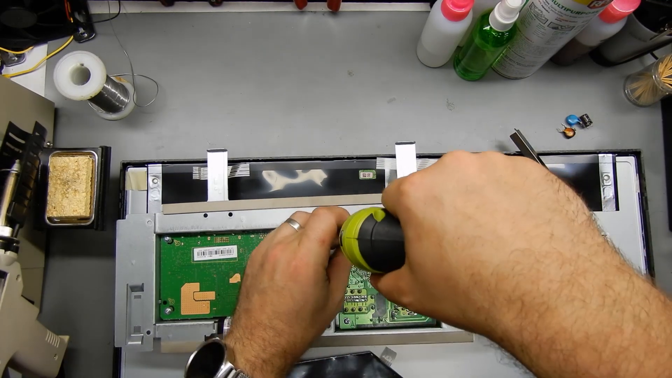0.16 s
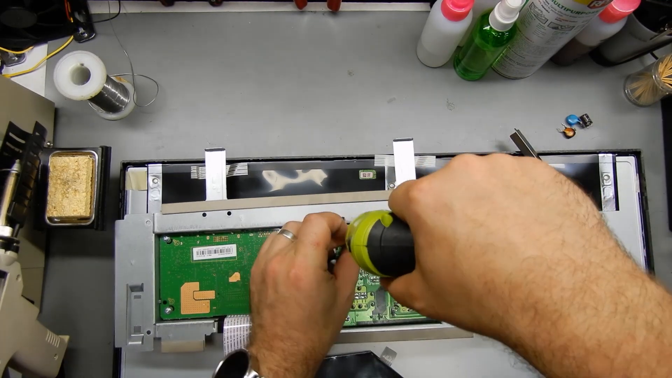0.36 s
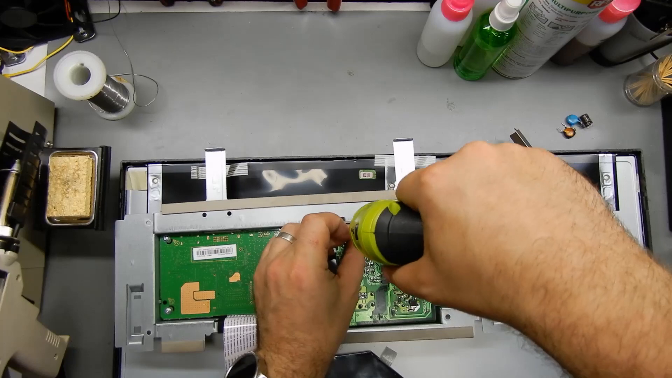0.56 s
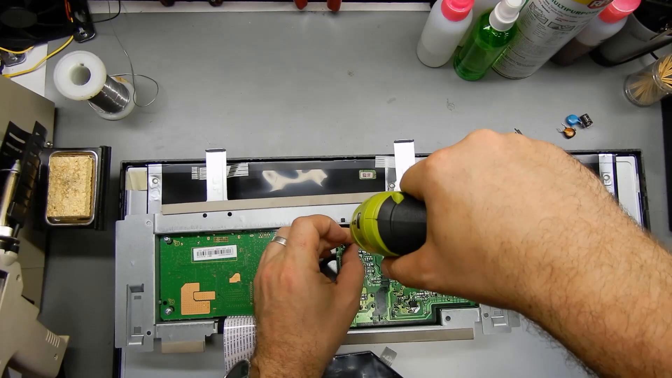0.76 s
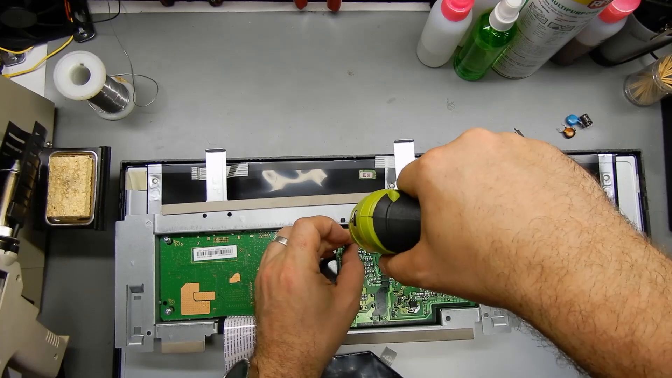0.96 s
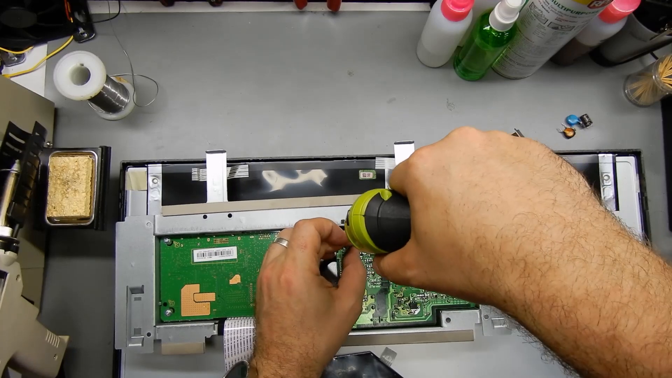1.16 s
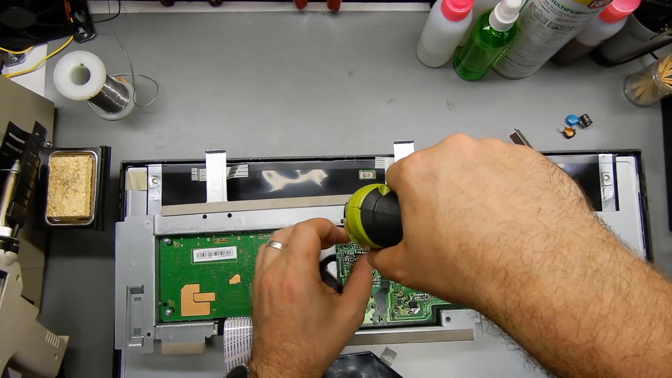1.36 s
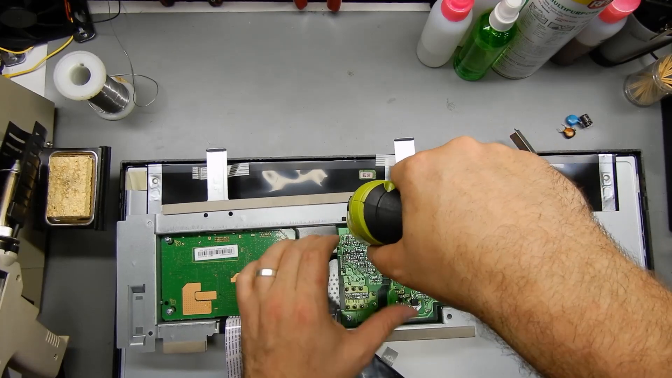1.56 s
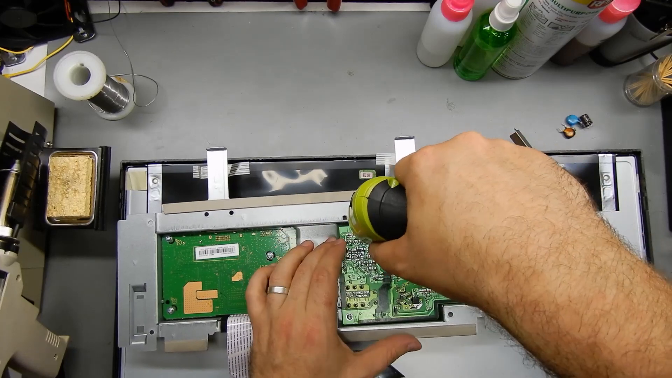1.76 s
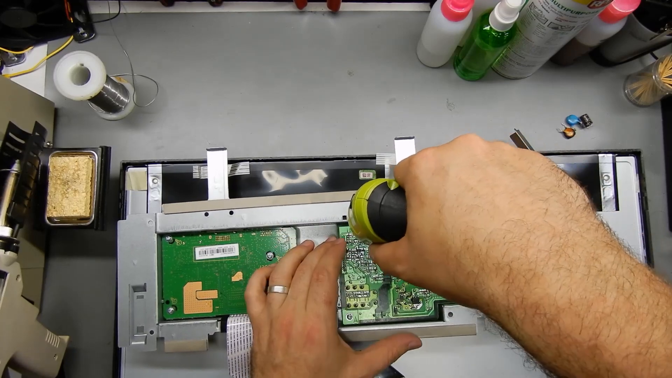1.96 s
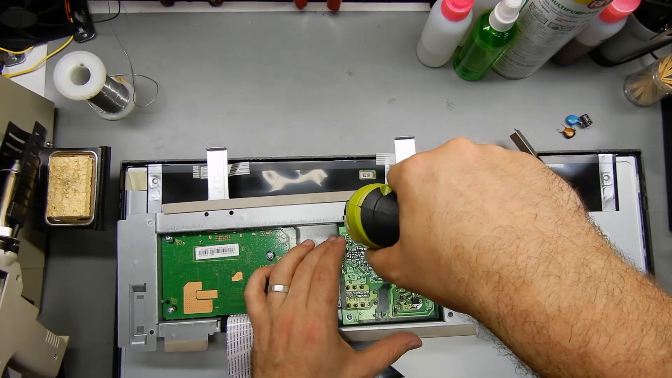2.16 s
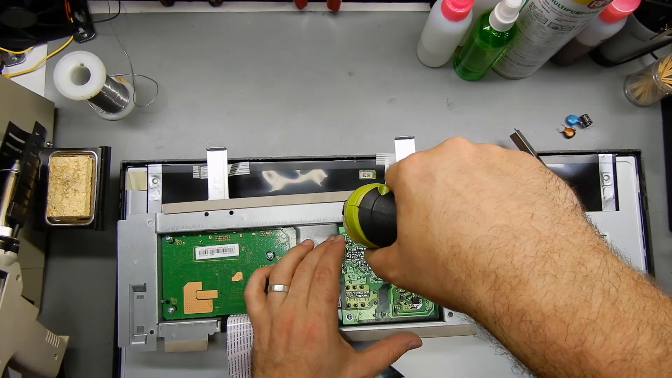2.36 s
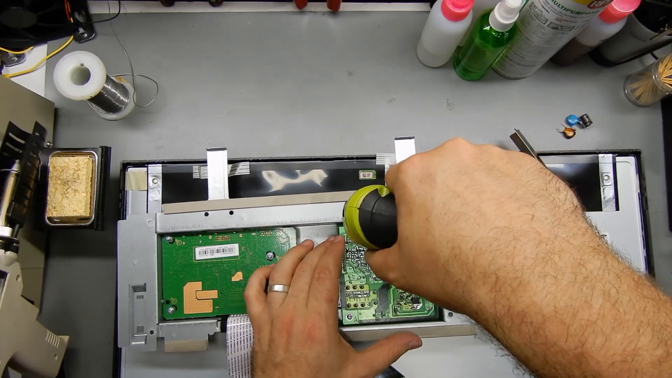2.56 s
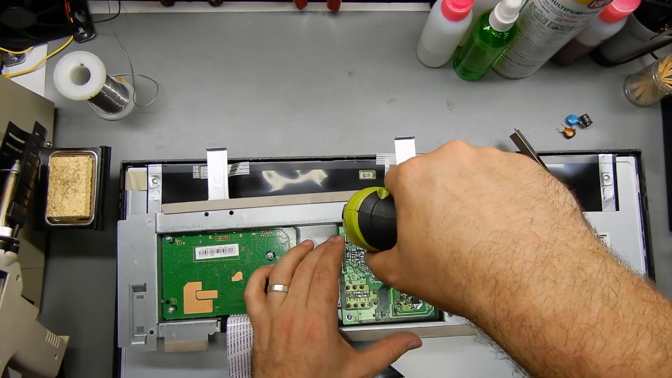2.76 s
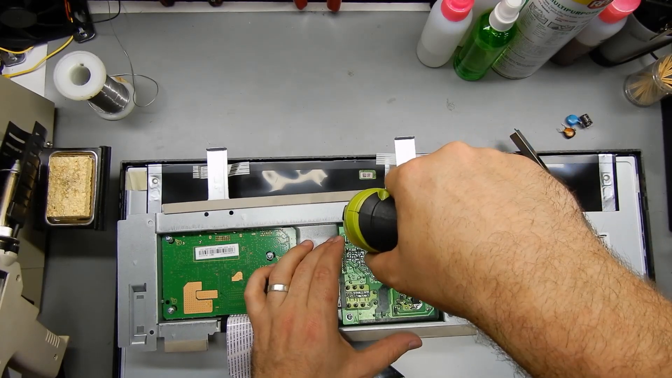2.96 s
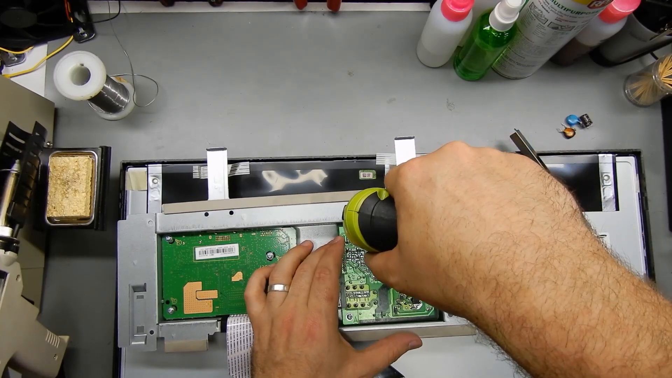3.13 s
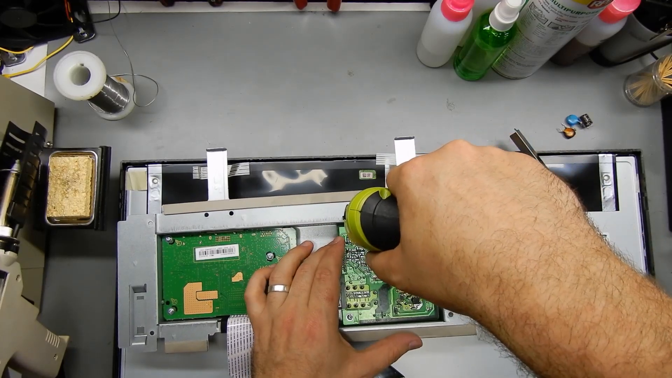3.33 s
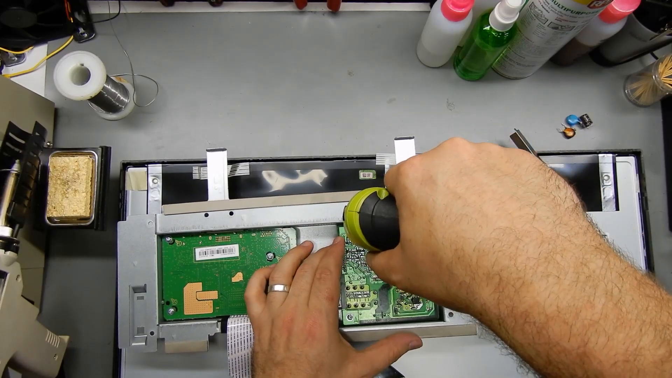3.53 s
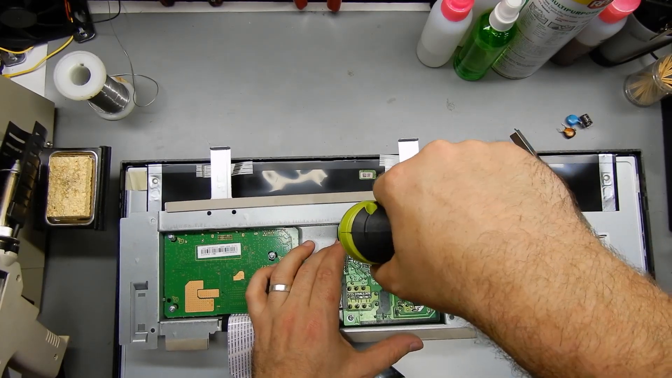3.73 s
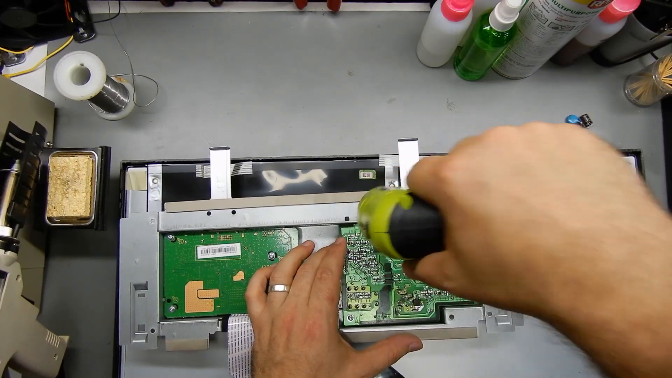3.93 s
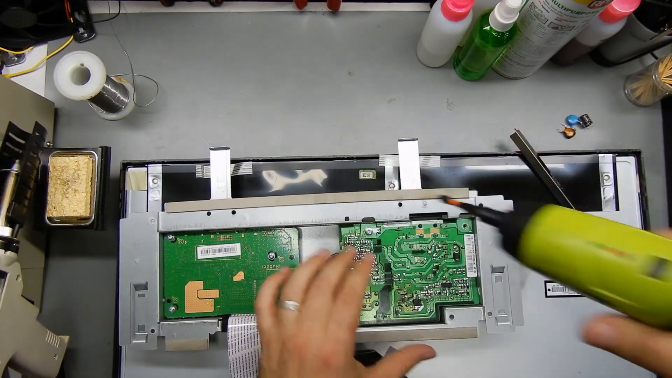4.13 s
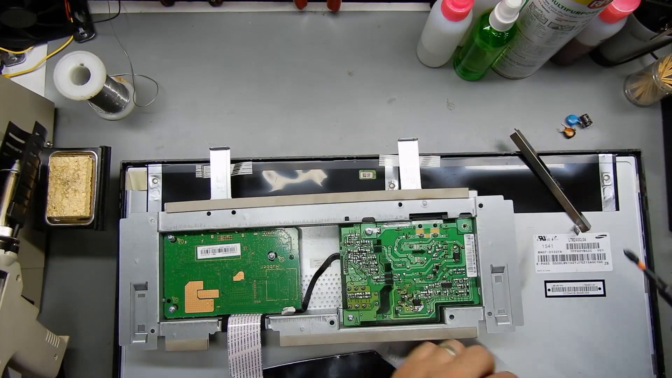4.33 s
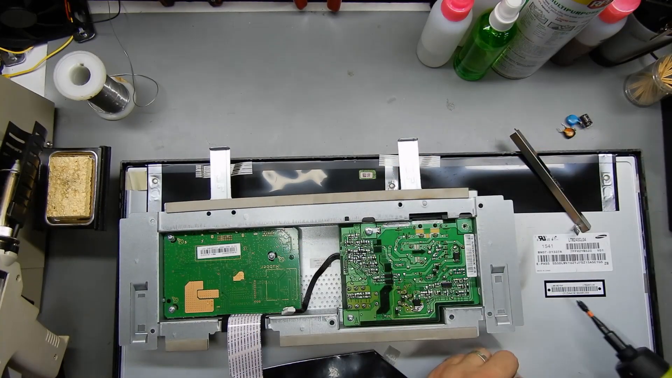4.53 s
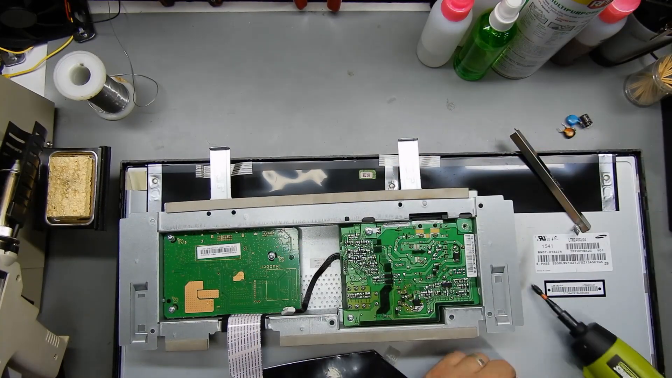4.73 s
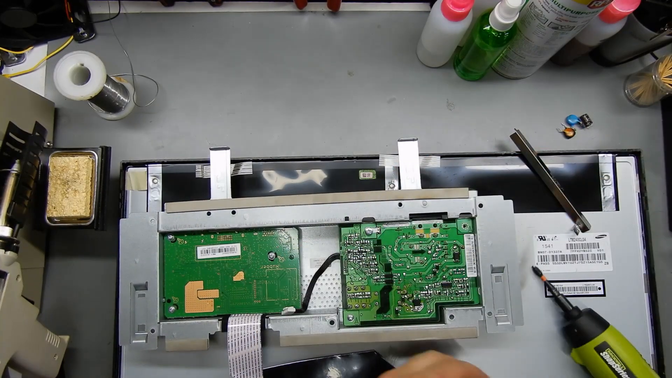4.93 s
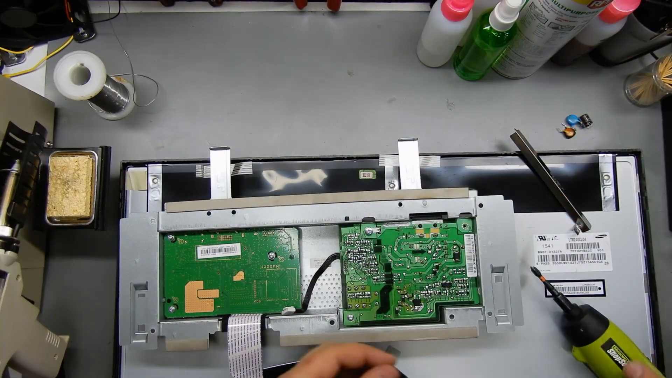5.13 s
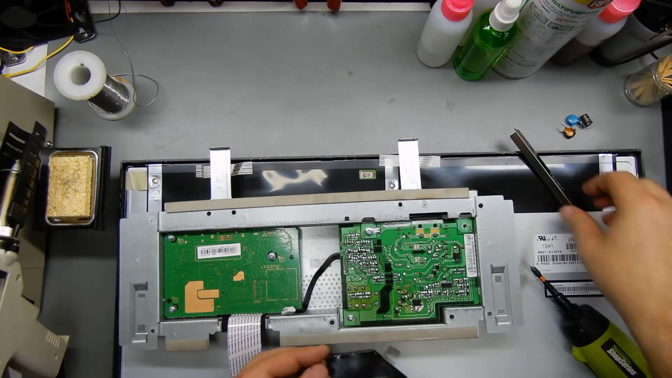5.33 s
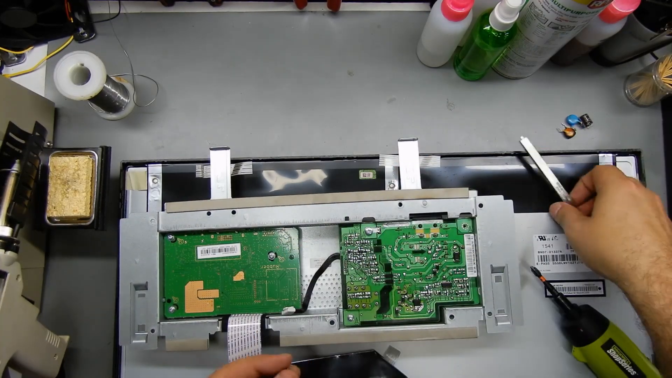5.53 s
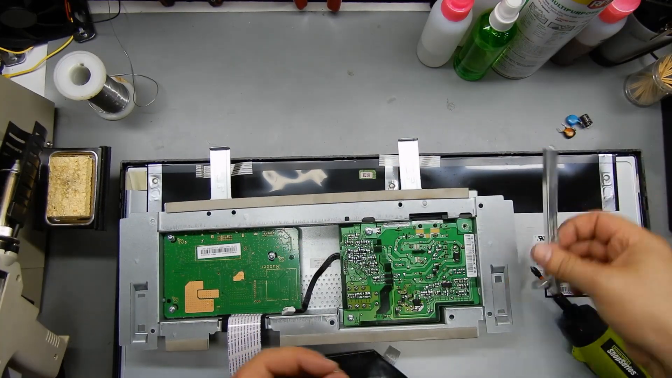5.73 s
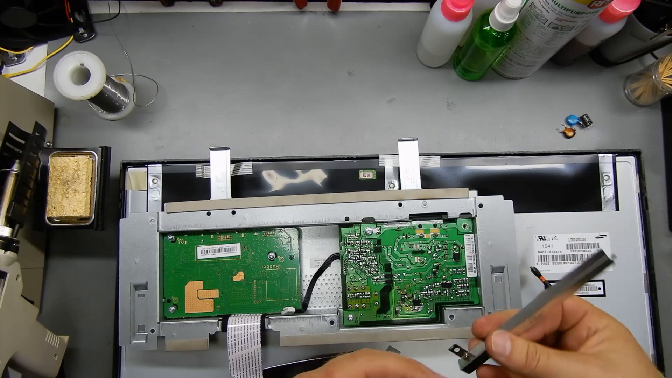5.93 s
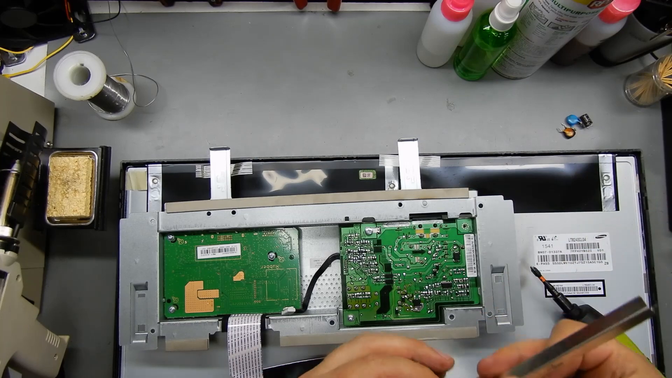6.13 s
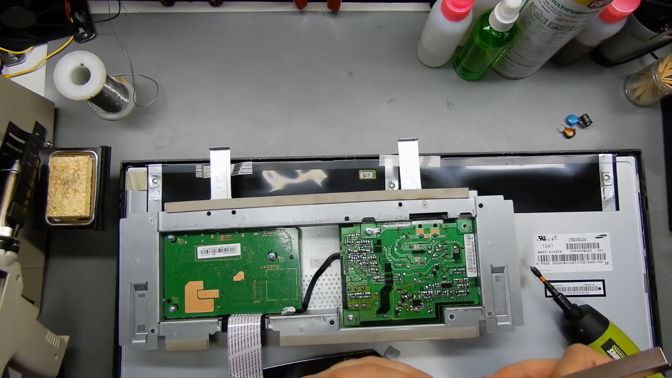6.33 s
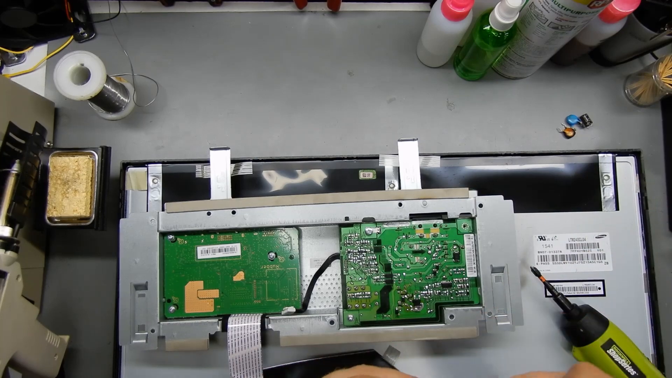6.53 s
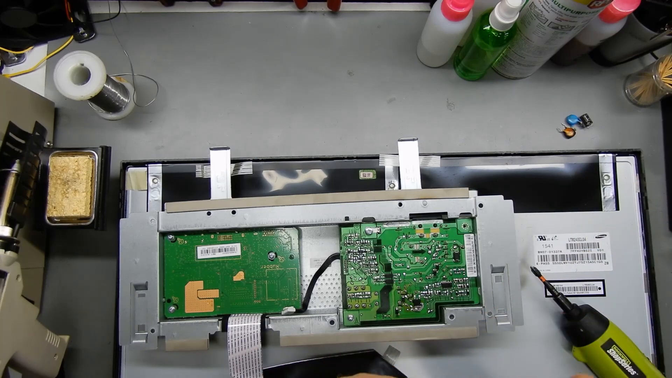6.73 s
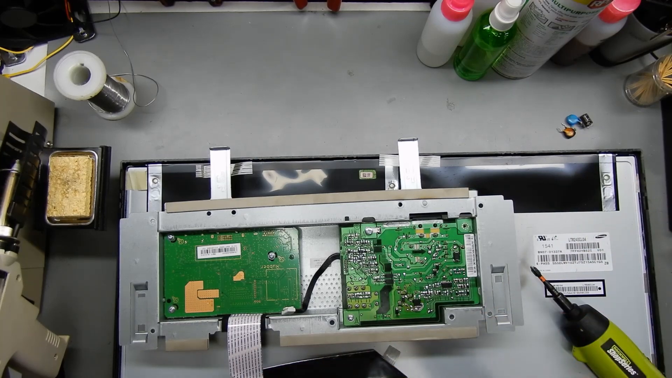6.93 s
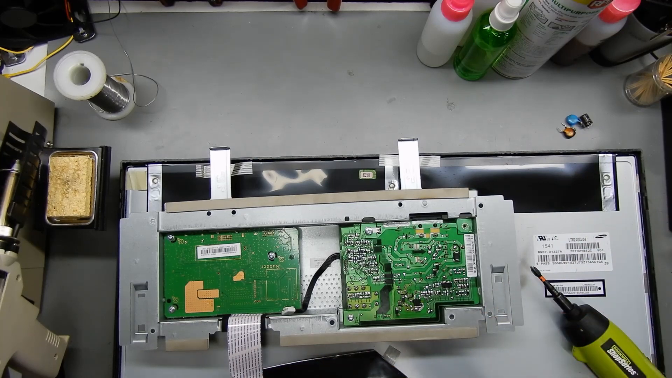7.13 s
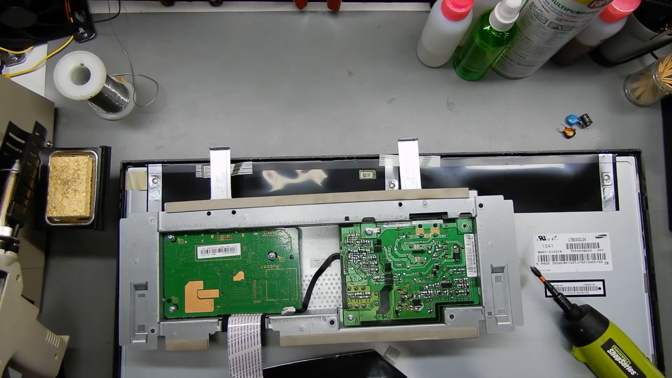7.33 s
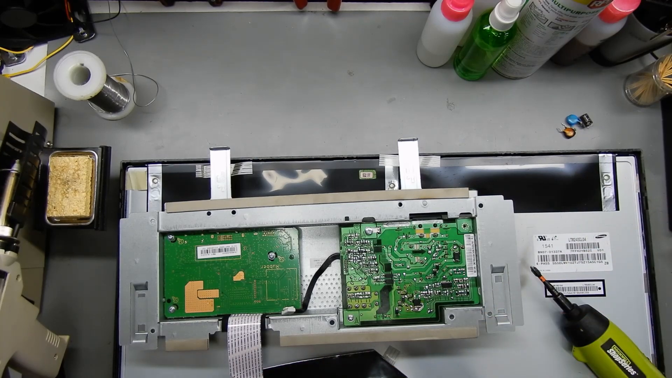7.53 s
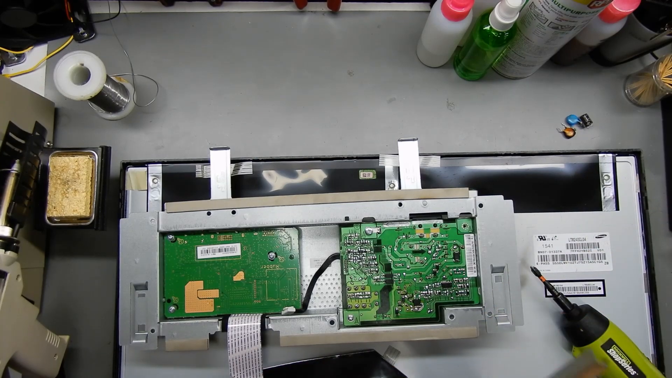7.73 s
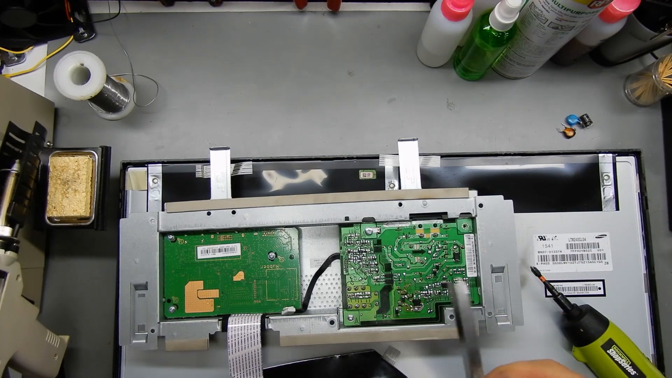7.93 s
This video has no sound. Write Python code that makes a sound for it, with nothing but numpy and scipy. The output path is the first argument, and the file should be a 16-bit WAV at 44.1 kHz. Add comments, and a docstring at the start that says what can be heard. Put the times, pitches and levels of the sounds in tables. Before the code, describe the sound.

A screw bit taps into place, a small electric driver buzzes and tightens a screw, then is laid on sheet metal with a clank.

```python
"""In a quiet workshop, a cordless screwdriver drives a screw through a circuit board into sheet metal, close by.
The bit clicks into the screw head; the motor spins up, sags as the thread binds, and grinds as the screw seats.
The tool is laid on the chassis and rocks to rest, a metal strip is picked up, the bench is bumped, parts tick.
Shaft-locked tones and gear-gated noise make the tool; filtered noise bursts and damped modes make the contacts."""
import sys
import numpy as np
from scipy import signal
from scipy.fft import rfft, irfft, next_fast_len
from scipy.io import wavfile
from scipy.ndimage import map_coordinates

SR = 44100
rng = np.random.default_rng(int(sys.argv[2]) if len(sys.argv) > 2 else 0)


def store_wav(level_fs):
    """Save 16-bit WAV to argv[1]."""
    pcm = np.round(np.clip(np.atleast_2d(level_fs), -1, 1) * 32767)
    wavfile.write(sys.argv[1], SR, pcm.T.astype(np.int16))


N = 351902

TRIGGER_S = 1.432  # the trigger is pressed
FREE_HZ = 417.1  # turns per second of the unloaded motor


def amp(db):
    """Level to gain: 20 dB is a factor of ten in amplitude."""
    return 10 ** (np.asarray(db) / 20)


def unit(x):
    """Normalisation: x at rms 1."""
    return x / np.sqrt(np.mean(x ** 2) + 1e-20)


def along(points, hz):
    """Linear interpolation of (frequency, value) points on a logarithmic frequency axis."""
    f, v = np.transpose(points)
    return np.interp(np.log(hz + 1), np.log(f + 1), v)


def wobble(rate):
    """Slow modulation: a smooth random curve through `rate` normal knots a second."""
    knots = rng.standard_normal(int(N * rate / SR) + 4)
    return map_coordinates(knots, [np.arange(N) * rate / SR])


def swells(rows):
    """Superposition of Gaussian rises, each (middle_s, half_width_s, height)."""
    t = np.arange(N) / SR
    return sum(height * np.exp(-((t - middle) / half) ** 2) for middle, half, height in rows)


def coloured(x, spectrum):
    """Minimum-phase filtering: unit power gain, falling away outside the (hz, level_db) points."""
    m = next_fast_len(len(x) + 4096)
    hz = np.fft.rfftfreq(m, 1 / SR)
    skirted = [(spectrum[0][0] / 2, -90), *spectrum, (spectrum[-1][0] * 2, -90)]
    gain = amp(along(skirted, hz))
    # folding the cepstrum onto positive times makes the filter causal
    cepstrum = irfft(np.log(unit(gain) + 1e-6), m)
    cepstrum[1:m // 2] *= 2
    cepstrum[m // 2 + 1:] = 0
    response = np.exp(rfft(cepstrum))
    return irfft(rfft(x, m) * response, m)[:len(x)]


def rush(spectrum, grit_db=0):
    """Broadband noise of rms 1; grit breaks it into tiny contacts before it is coloured."""
    grains = rng.standard_normal(N) * amp(grit_db * wobble(1500))
    return unit(coloured(grains, spectrum))


def fade(t, t60):
    """Exponential damping: 60 dB down after t60 seconds."""
    return np.exp(-np.log(1000) * t / max(t60, 1e-4))


def ring(modes, t, detune=0):
    """Modal synthesis: damped sines whose strength and pitch change with the point of contact."""
    out = 0
    for hz, db, t60 in modes:
        strength = amp(db + rng.normal(0, 3))
        pitch = hz * (1 + detune * rng.standard_normal())
        out = out + strength * fade(t, t60) * np.sin(2 * np.pi * pitch * t)
    return out


def burst(t, crack, buzz_db, t60, rise):
    """Contact force: a brief noisy crack, then the dying buzz of loose parts (crack and rise are t60s)."""
    envelope = fade(t, crack) + amp(buzz_db) * fade(t, t60)
    return (1 - fade(t, rise)) * envelope * rng.standard_normal(len(t))


def add(track, s, sound):
    """Superposition: mix a sound into a track at s seconds."""
    part = track[max(round(s * SR), 0):][:len(sound)]
    part += sound[:len(part)]


def background():
    """Background noise: low rumble of building and bench, swelling as things are handled, under steady hiss."""
    # noise colours: hz, density_db (relative)
    rumble = [(20, -24), (35, -8), (60, -1), (107, -10), (140, -15.5), (175, -29.5), (340, -36.5),
              (600, -45)]
    hiss = [(200, 7), (400, 4.5), (750, 0.5), (1500, -2), (3000, -7), (5000, -7), (6800, 2), (8800, 2),
            (10000, -5), (15500, -10.5)]
    # the bench trembles as hands move things about: middle_s, half_width_s, extra_rumble_db
    trembles = [(1.1, 0.91, 5.5), (5.1, .25, 9.5), (6.1, 0.25, 9)]
    return amp(-70.5 + swells(trembles)) * rush(rumble) + amp(-82.5) * rush(hiss)


def workshop(x):
    """Diffuse reverberation: a noise tail in which each frequency dies at its own speed."""
    # decay of the room: hz, t60_s
    room = [(150, .35), (1500, 0.28), (6000, .38), (14000, .25)]
    hz, t, z = signal.stft(rng.standard_normal(SR // 2), SR, nperseg=256)
    decay = np.exp(-np.log(1000) * t / along(room, hz)[:, None])
    tail = signal.istft(z * decay, SR, nperseg=256)[1]
    delay = round(.005 * SR)
    response = np.pad(tail / np.linalg.norm(tail), (delay, 0))
    return signal.fftconvolve(x, response)[:N]


def bumps():
    """Low-frequency plate modes: soft pushes make the bench top boom."""
    # pushes against the bench: start_s, level_db (relative)
    pushes = [(0.549, -52), (.63, -55.5), (.71, -58.5), (1.191, -56.5), (5.087, -41.5), (5.659, -40.5),
              (5.913, -43), (5.935, -50), (6.194, -49)]
    # boom of the bench top: mode_hz, level_db, t60_s
    bench = [(41, -5, .4), (76, 1, .3), (129, -3, .18)]
    out, t = np.zeros(N), np.arange(SR // 2) / SR
    for s, db in pushes:
        add(out, s, amp(db) * (1 - fade(t, 0.048)) * ring(bench, t))
    return out


def ticks():
    """Impact on small stiff bodies: a bright snap and a thin steel ring."""
    # trigger and small metal parts: start_s, level_db, brightest_hz, ring_db (levels relative)
    small_contacts = [(.636, -48, 10300, -31), (1.4332, -30.5, 6600, -18), (4.594, -44, 9000, -30),
                      (5.637, -42.5, 11000, -17), (6.174, -40, 11800, -22.5), (6.452, -53, 8200, -19),
                      (6.585, -43.5, 11910, -4), (6.89, -49.5, 5600, -17), (7.4157, -31.5, 9600, -24),
                      (7.4191, -26, 9500, -24), (7.442, -26.5, 8600, -20), (7.4445, -28, 10400, -21),
                      (7.655, -53, 8000, -24), (7.7118, -26, 9200, -32)]
    # bending modes: multiple of the lowest ring, level_db, t60_s
    steel = [(1, -3, 0.08), (1.075, -10, .06), (1.47, -14, .08), (2.24, -11.5, .06), (2.56, -5, .1),
             (2.76, -8, .08)]
    lowest_hz = 4493
    modes = [(k * lowest_hz, level, t60) for k, level, t60 in steel]
    out, t = np.zeros(N), np.arange(SR // 3) / SR
    for s, db, hz, ring_db in small_contacts:
        snap = burst(t, crack=0.0059, buzz_db=-14.5, t60=0.06, rise=.001)
        # small parts radiate little below their first bending mode
        colour = [(700, -34), (1250, -25), (2000, -38), (3000, -30), (4300, -19), (4900, -8),
                  (max(hz, 5000), 0), (1.3 * hz, -2), (1.4 * hz, -17), (1.7 * hz, -32)]
        bright = amp(db - 3.0) * coloured(snap, colour)
        add(out, s, bright + amp(db + ring_db - 5) * ring(modes, t, detune=.01))
    return out


def slide(start, end, db, rise, fall):
    """Exponential envelope: rises, holds from start to end and dies; rise and fall are t60s."""
    t = np.arange(N) / SR
    return amp(db) * fade(np.maximum(start - t, 0), rise) * fade(np.maximum(t - end, 0), fall)


def rubbing():
    """Stick-slip friction: skin catches and slips on the board; the strip's edge drags over the chassis."""
    # hand off the board, then strip: start_s, end_s, level_db, rise_t60_s (negative = sudden), fall_t60_s
    hand_slide = (4.44, 4.5, -63, 0.47, .5)
    strip_drag = (5.5, 5.5, -60.5, -0.1, 0.22)
    # friction colours: hz, density_db (relative)
    palm = [(150, -6.5), (260, 0), (450, -11), (600, -2), (720, 3.5), (850, -13.5), (2100, -13.5),
            (3000, -46), (8000, -24)]
    strip_edge = [(200, -1), (400, 11), (700, -2), (1300, -0.5), (3200, -3), (7000, -6.5), (12000, -5),
                  (15000, -20.5)]
    hand = slide(*hand_slide) * unit(amp(4.4 * wobble(55)) * rush(palm, grit_db=5.5))
    strip = slide(*strip_drag) * amp(1.5 * wobble(60)) * rush(strip_edge, grit_db=4.0)
    return hand + strip


def scrapes():
    """Sliding friction: each short scrape swells and dies as gritty noise around one pitch."""
    # tool, fingers and strip over the chassis: middle_s, half_width_s, level_db, centre_hz
    short_slides = [(0.588, 0.069, -65.5, 393), (1.19, 0.02, -60, 2360), (1.251, .008, -60, 2600),
                    (3.78, 0.045, -71, 1937), (4.019, 0.15, -76.5, 8660), (4.108, 0.019, -66.5, 7000),
                    (4.117, 0.027, -68, 1810), (4.526, 0.0074, -55, 712), (4.54, .08, -68, 760),
                    (4.598, .018, -63, 5130), (5.427, .009, -52, 7550), (5.541, 0.015, -47, 1350),
                    (5.66, 0.11, -70, 7800)]
    out = np.zeros(N)
    t = np.arange(-SR // 3, SR // 3) / SR
    for s, half, db, hz in short_slides:
        grit = rng.standard_normal(len(t)) * amp(1.5 * wobble(900)[:len(t)])
        colour = [(hz / 3, -20), (hz / 1.5, -3), (hz, 0), (1.3 * hz, -6), (1.8 * hz, -24)]
        band = unit(coloured(grit, colour))
        add(out, s + t[0], amp(db) * np.exp(-(t / half) ** 2) * band)
    return out


def contacts(count=4):
    """Impact sequences: single knocks, even fading contacts of the rocking tool, random jostling."""
    # bit, tool and strip on the chassis: start_s, level_db, thud_db, chink_db (levels relative)
    single = [(0.413, -55, -6, -15.5), (0.529, -46, -32, -8), (0.541, -38, -16.5, -19.5),
              (0.927, -52, -28, -7), (0.938, -41.5, -29, -22), (0.952, -32.5, -25, -21),
              (0.965, -39, -21.5, -7), (1.02, -50, -6.5, -30), (1.092, -43, -22, -19),
              (1.133, -31.5, -37, -16.5), (1.154, -31.5, -20.5, -13.5), (1.32, -52.5, -15, -9.5),
              (3.808, -53, -12, -14), (3.895, -48.5, -27, -10), (4.419, -52.5, -16, -1),
              (4.864, -31, -20.5, -13.5), (4.89, -33.5, -4.5, -26.5), (4.963, -31, -13.5, -24),
              (4.995, -41, 0.5, -17.5), (5.037, -25.5, -1, -25), (5.041, -25, -3, -11),
              (5.081, -12.5, -10.5, -11.5), (5.11, -33, -9.5, -5.5), (5.133, -39, -3.5, -11),
              (5.418, -41, -8, -4), (5.543, -40, -14, -25), (5.598, -33, -14.5, -13.5)]
    # first contact of the tool rocking to rest on its side: the same columns
    rock = (5.1535, -37, -9.5, -11)
    rock_period_s, rock_loss_db = .0535, 5.5  # from one contact to the next
    # parts jostled as they are handled: start_s, end_s, typical_level_db, thud_db, chink_db
    jostles = [(0.549, .66, -59.5, -5, -18), (1.16, 1.21, -49, -12, -17), (4.87, 5.03, -49.5, -4, -13),
               (5.42, 5.64, -51.5, -9.5, -5.5)]
    jostle_per_s, scatter_db = 60, 2.5  # pace of the contacts (median gap 1/60 s), spread of their levels

    s, db, thud_db, chink_db = rock
    rows = list(single)
    for k in range(count):
        rows.append((s + k * rock_period_s, db - k * rock_loss_db, thud_db, chink_db))
    for start, end, db, thud_db, chink_db in jostles:
        gaps, sizes = rng.standard_normal((64, 2)).T
        times = start + np.cumsum(np.exp(.5 * gaps)) / jostle_per_s
        rows += [(s, db + scatter_db * size, thud_db, chink_db) for s, size in zip(times, sizes) if s < end]
    return rows


def knocks():
    """Impact excitation: each contact shakes the chassis low, middle and high and rings its modes."""
    # chassis under a blow, low, middle and high: hz, density_db (relative)
    thud_colour = [(40, -15.5), (90, -10), (125, 0), (170, -10), (260, -7), (340, 0.5), (400, -1.5),
                   (480, -4), (600, -5.5), (760, -10.5), (950, -11), (1400, -15)]
    clack_colour = [(400, -23), (760, -7.5), (920, -11), (1050, -6.5), (1220, 1.5), (1400, -1.5), (1580, 5),
                    (2100, 0), (2450, -1.5), (3000, -7), (4500, -11.5), (7000, -23.5)]
    chink_colour = [(3000, -30.5), (5200, -3.5), (7000, 3), (9000, 1.5), (11500, -1), (13000, -7),
                    (15800, -21)]
    # ring of the whole panel and of its stiff edges: mode_hz, level_db, t60_s
    panel = [(322.4, -4.5, 0.45), (466, -2, 0.13), (920, -3, .14), (1184, 1.5, 0.15), (1574, -7.5, 0.17),
             (1820, -8.5, 0.24), (2503, -6, 0.18)]
    edges = [(6700, -8, .15), (6955, -4.5, 0.17), (11300, -2, .12), (11490, -3.5, 0.17)]
    thud, clack, chink, modes = np.zeros((4, N))
    t = np.arange(SR // 3) / SR
    for s, db, thud_db, chink_db in contacts():
        low = burst(t, crack=0.015, buzz_db=-3, t60=.13, rise=0.0018)
        middle = burst(t, crack=.024, buzz_db=-8.5, t60=0.13, rise=.001)
        high = burst(t, crack=0.02, buzz_db=-7.5, t60=0.1, rise=.004)
        add(thud, s, amp(db + thud_db + 16) * np.ones(1))  # one-sample blow
        add(thud, s, amp(db + thud_db - 1.0) * low)
        add(clack, s, amp(db - 9.0) * middle)
        add(chink, s, amp(db + chink_db) * high)
        panel_ring = amp(db - 29.5) * ring(panel, t, detune=0.011)
        edge_ring = amp(db + chink_db - 18.0) * ring(edges, t, detune=.012)
        add(modes, s, panel_ring + edge_ring)
    blows = coloured(thud, thud_colour) + coloured(clack, clack_colour) + coloured(chink, chink_colour)
    # the loose sheets touch as they ring, which roughens the tones
    return blows + modes * (1 + wobble(160)) / np.sqrt(2)


def motor():
    """Torque balance: thread load, seating (0-1) and shaft speed (Hz); load slows the shaft, a brake stops it."""
    seat_s, release_s = 3.575, 3.7033  # the screw head starts to seat, the trigger is let go
    # a quick spin-up, then a creep to full speed: missing_hz at the start, time_constant_s
    spin_up = [(150, .055), (10, .55)]
    # the screw binds in its thread: middle_s, half_width_s, load (1 = a firm bind)
    binds = [(1.64, .11, .9), (2.0, 0.061, 1.05), (2.2, .015, .9), (2.29, 0.046, 0.52), (2.47, 0.041, 0.62),
             (2.59, .035, .45), (2.73, .04, 1.35), (2.83, 0.049, 0.78), (2.96, .04, .7), (3.14, .045, 0.87),
             (3.25, .04, 0.36), (3.52, .05, 0.83)]
    sag_hz, inertia_s = 2.2, .015  # speed lost at load 1, and its lag behind the load
    seat_rise_s, seat_sag_hz_per_s, brake_s = .085, 400, .024

    t = np.arange(N) / SR
    running, sinking, braking = (np.maximum(t - s, 0) for s in (TRIGGER_S, seat_s, release_s))
    load = swells(binds)
    seated = np.minimum(sinking / seat_rise_s, 1)
    speed = FREE_HZ - sum(hz * np.exp(-running / tau) for hz, tau in spin_up)
    speed = speed - sag_hz * np.interp(t - inertia_s, t, load) - seat_sag_hz_per_s * sinking
    return load, seated, np.maximum(speed, 0) * np.exp(-braking / brake_s)


def seating():
    """Rotary friction: the turning screw head grinds on the board, harder as it is drawn down."""
    # grinding colour: hz, density_db (relative)
    grind = [(350, -12), (700, -10), (1000, -9), (1250, -1), (1450, 2), (1750, -2), (2100, -3), (2800, -16)]
    _, seated, speed = motor()
    return amp(-40) * (seated * speed / FREE_HZ) ** 2 * rush(grind, grit_db=4)


def tones(orders, speed, flutter_db, slack):
    """Order tones: shaft multiples, fluttering in level and phase, lifted near the motor can's resonance."""
    can_hz, can_width_hz, can_db = 7470, 280, 12.5
    turns = np.cumsum(speed) / SR
    out = 0
    for k, db in orders:
        lift_db = can_db / (1 + ((k * speed - can_hz) / can_width_hz) ** 2)
        level = amp(db + lift_db + flutter_db * wobble(14)) * np.sqrt(2)
        phase = np.pi * round(2 * k) * turns + slack * wobble(45)  # orders in half steps
        out = out + level * np.sin(phase)
    return out


def strokes(turns, sharp, scatter_db):
    """Periodic impact: one sharp bite of uneven strength in every turn, at about rms 1."""
    strength = unit(amp(scatter_db * rng.standard_normal(8192)))
    bite = np.sqrt(2 * sharp) * np.exp(-sharp * (turns % 1))
    return bite * strength[turns.astype(int) % len(strength)]


def imprint(turns, size):
    """Periodic roughness: the same random wheel profile of `size` points passes on every turn."""
    profile = unit(rng.standard_normal(size))
    return map_coordinates(profile, [turns % 1 * size], mode="grid-wrap")


def screwdriver():
    """Gear-mesh excitation: the motor whines; biting teeth rattle the housing, harder with speed and load."""
    # tones of the motor, then of the planet gears: multiple of the wheel's turn, level_db (relative)
    motor_orders = [(.5, -24), (1, -26), (1.5, -11.5), (2, -26), (2.5, -19.5), (3, -0.5), (6, -10.5),
                    (9, -14), (12, -4.5), (17, -13), (18, -8.5), (19, -7), (21, -10), (32, -27)]
    gear_orders = [(3, -27), (4, -27), (6, -12.5), (7, -27), (9, -6.5), (10, -11.5), (36, -9.5)]
    # plastic housing, then gear teeth: hz, density_db (relative)
    housing = [(100, -21), (260, -30.5), (340, -20.5), (600, -16), (950, -13.5), (1250, -2.5), (1450, -3),
               (2100, -8.5), (3300, -10.5), (4500, -16), (7000, -22)]
    teeth_colour = [(1500, -21.5), (3900, -3.5), (4500, 3.5), (5600, -3), (6700, -1.5), (7400, 0),
                    (8100, -2.5), (8700, -1.5), (9700, -3), (11100, 0.5), (12000, -15), (13500, -21.5),
                    (15800, -29)]
    # rattle: free_db (before trim), extra_db at load 1, extra_db when seated, power of the speed
    growl_law = (-49.5, 3.5, 14.5, 1.55)
    chatter_law = (-47.5, 3.5, 10, 2)
    planet_ratio = 8 / 27  # planet turns per motor turn
    settle_power = 7  # tones grow with this power of the speed: slow gears only rattle
    first_cut = [(1.578, 0.082, 5.5)]  # the tip cuts its first thread: middle_s, half_width_s, extra_db

    load, seated, speed = motor()
    pace = speed / FREE_HZ * (np.arange(N) / SR > TRIGGER_S)
    turns = np.cumsum(speed) / SR
    planet = turns * planet_ratio

    def effort(db, load_db, seat_db, power):
        """Level law: load and seating add decibels, speed acts as a power."""
        return amp(db + load_db * load + seat_db * seated) * pace ** power

    planet_bite = .5 * strokes(planet, sharp=9, scatter_db=3.0)
    loose_bite = 0.23 * strokes(turns / 2, sharp=5.5, scatter_db=6.0)
    grit = amp(3.3 * wobble(1500)) * rng.standard_normal(N)
    teeth = unit(np.sqrt(1 + planet_bite ** 2 + loose_bite ** 2) * grit)
    # part of the meshing repeats exactly with the wheels, which combs the rattle with fine lines
    mesh = .3 * imprint(turns / 2, size=200) + .25 * imprint(planet, size=340)
    mesh = mesh * pace ** settle_power

    shell = unit(rush(housing, grit_db=4.5) + coloured(mesh, housing))
    growl = effort(*growl_law) * amp(swells(first_cut) - 0.88) * shell
    chatter = effort(*chatter_law) * amp(0.86 * wobble(25) - 0.8) * unit(coloured(teeth + mesh, teeth_colour))
    whine = tones(motor_orders, speed, flutter_db=0.8, slack=.15)
    whine = whine + tones(gear_orders, speed * planet_ratio, flutter_db=3.5, slack=0.3)
    # the tones sink by 16 dB as the screw seats
    return growl + chatter + amp(-57 - 16 * seated) * pace ** settle_power * whine


def scene():
    """Superposition of direct and diffuse sound: all sources on the bench, with a little of the room."""
    tool = screwdriver() + seating()
    handling = knocks() + rubbing() + scrapes()
    small = ticks()
    room = workshop(amp(-17.0) * tool + amp(-13.5) * handling + amp(-17) * small)
    return (tool + handling + small + room + bumps() + background())[None]


def record(dry):
    """Band limitation: an ideal low-pass keeps nothing from its cutoff up."""
    top_hz = 15800
    m = next_fast_len(N + SR // 2)
    passed = np.fft.rfftfreq(m, 1 / SR) < top_hz
    return irfft(rfft(dry, m) * passed, m)[..., :N]


dry = scene()
out = record(dry)
store_wav(out)
```